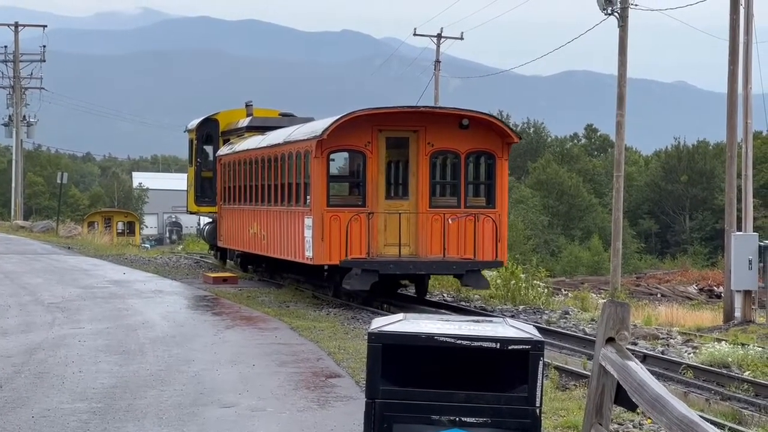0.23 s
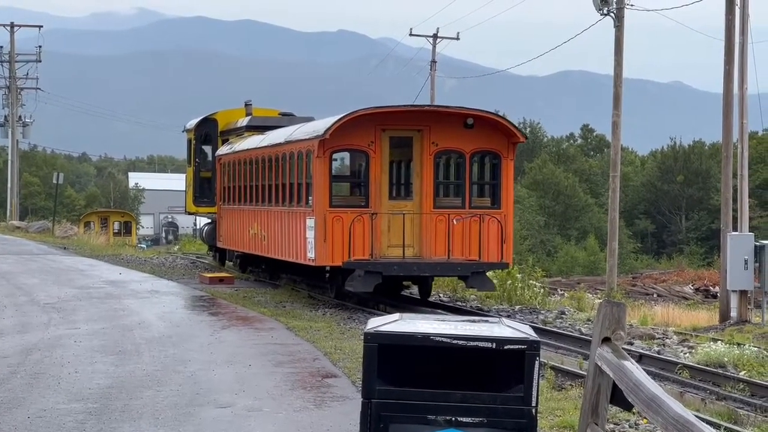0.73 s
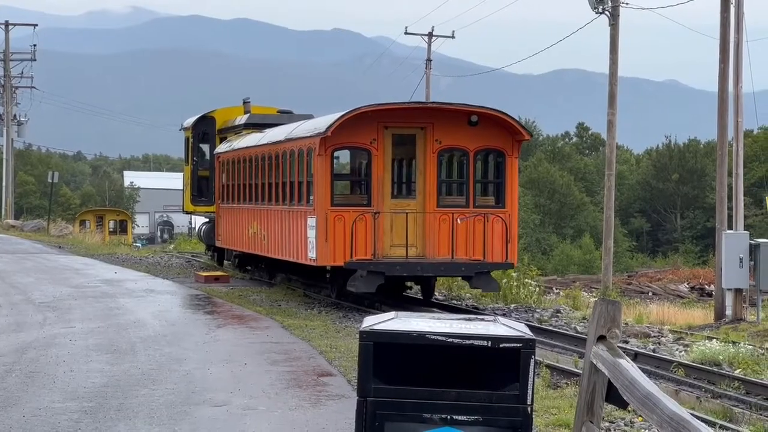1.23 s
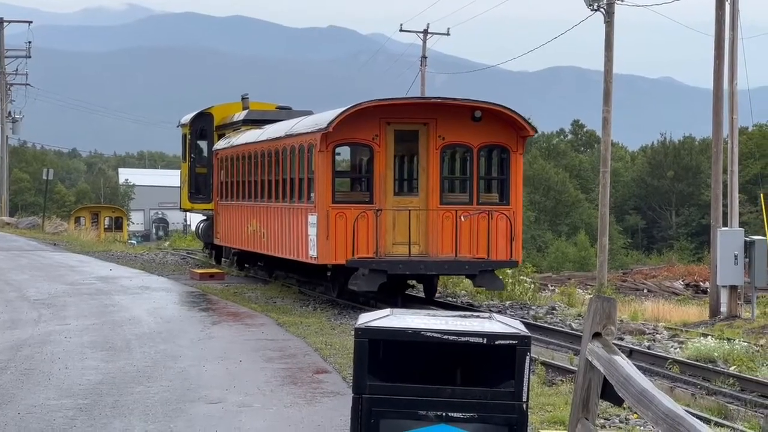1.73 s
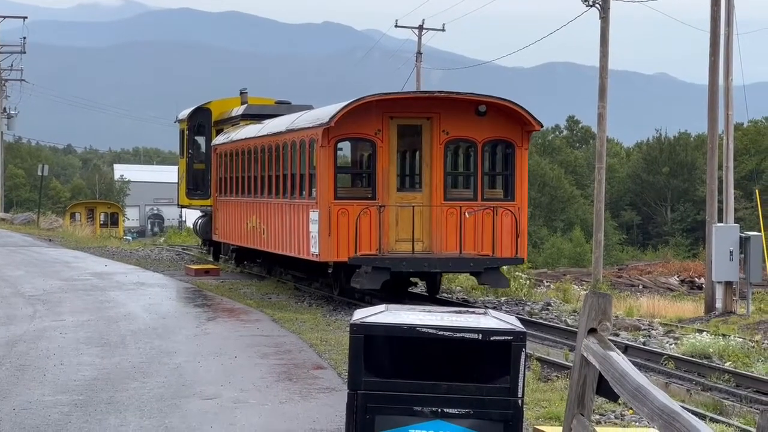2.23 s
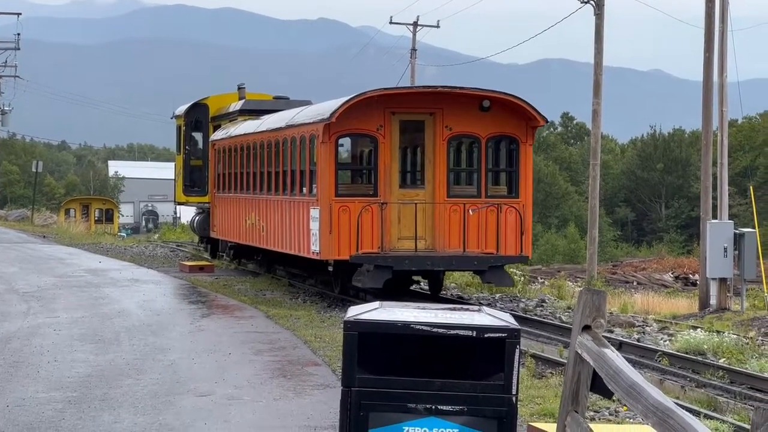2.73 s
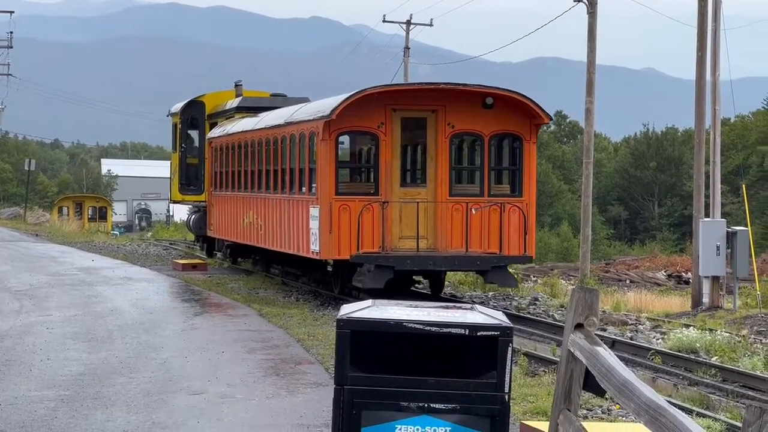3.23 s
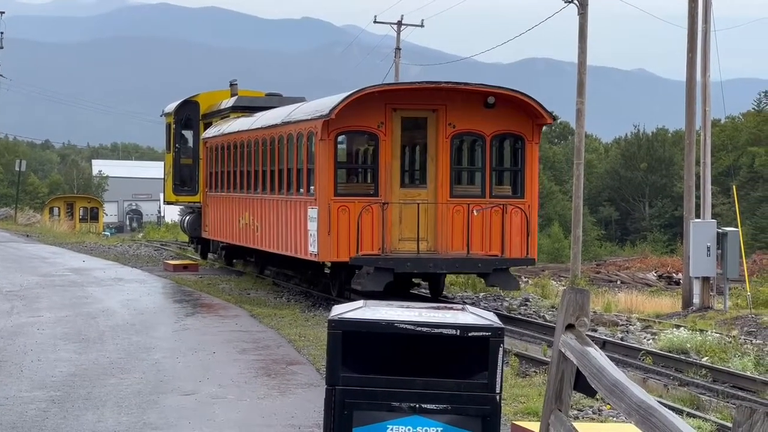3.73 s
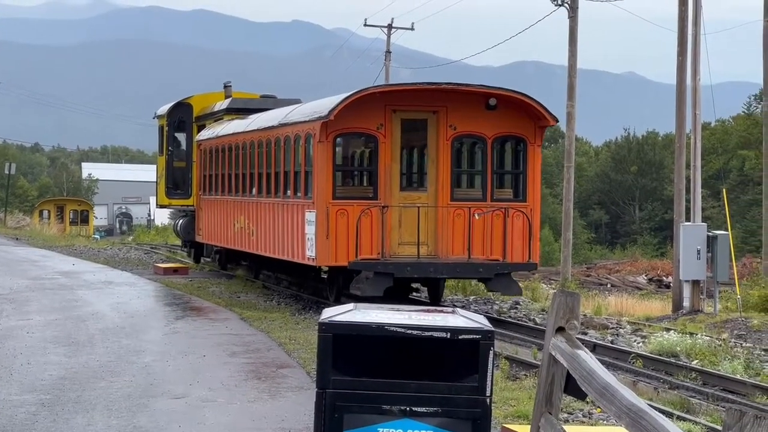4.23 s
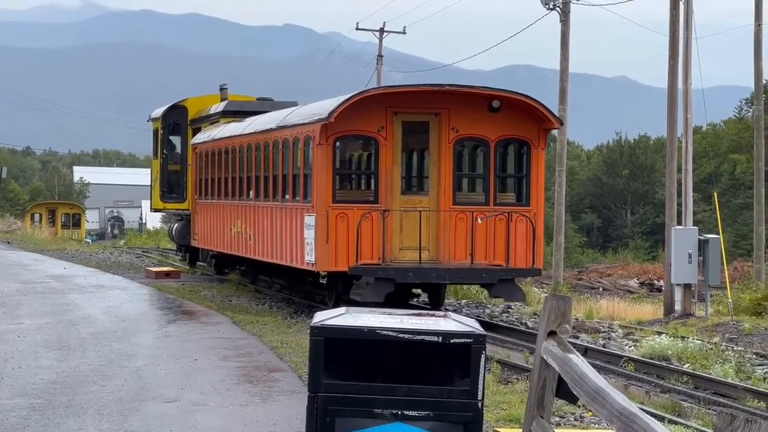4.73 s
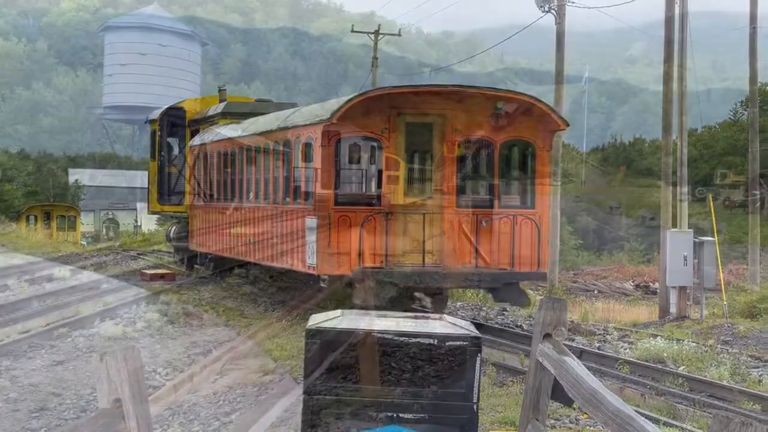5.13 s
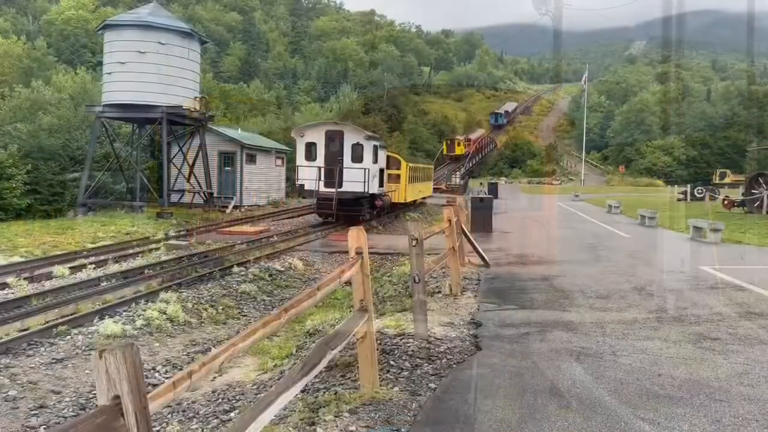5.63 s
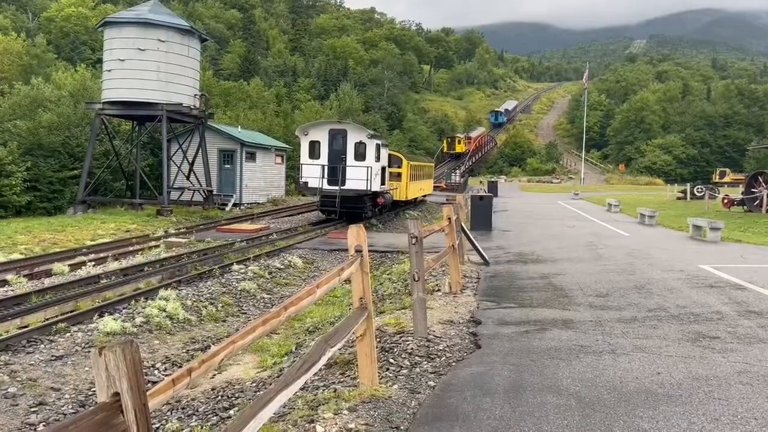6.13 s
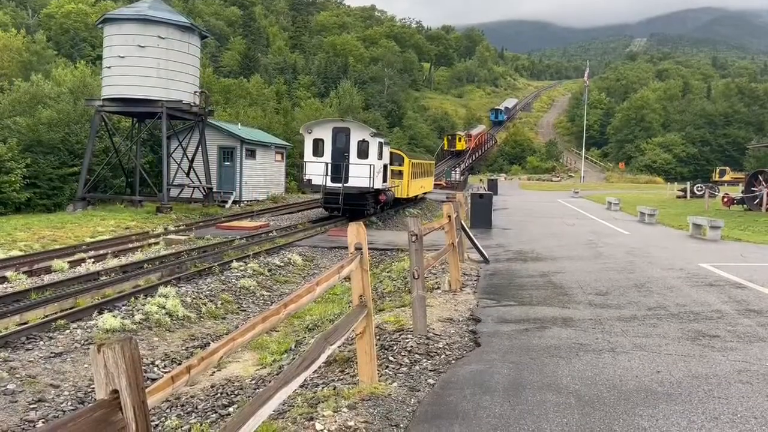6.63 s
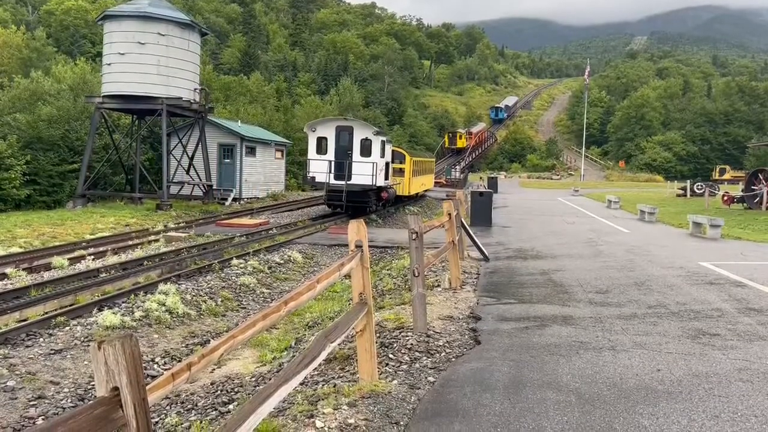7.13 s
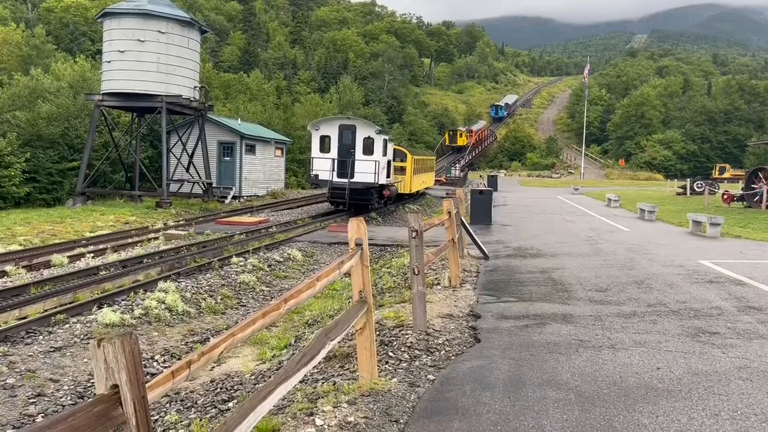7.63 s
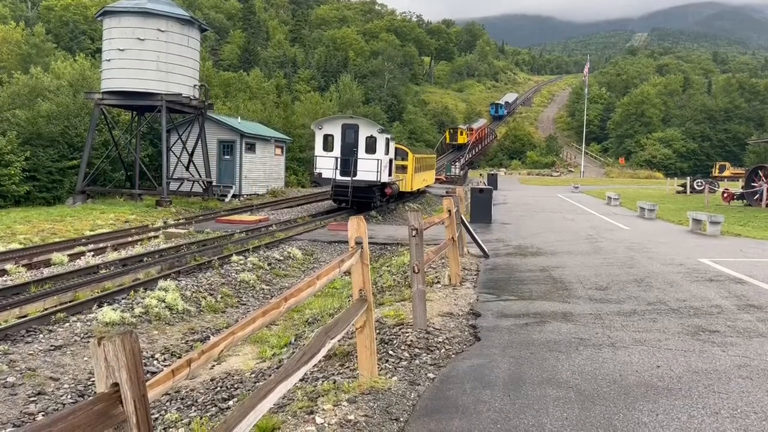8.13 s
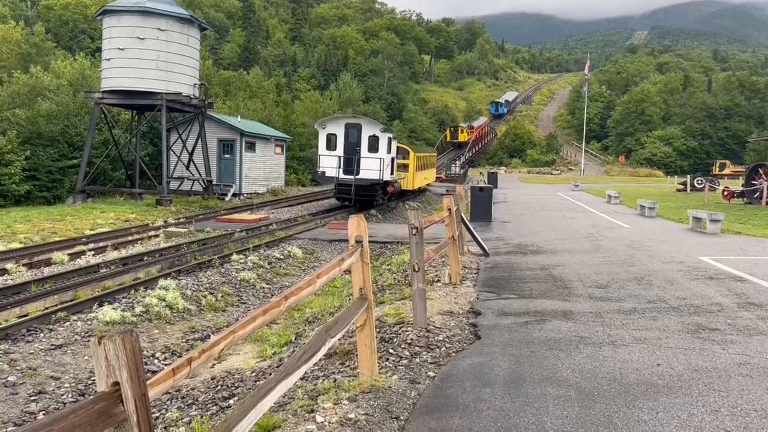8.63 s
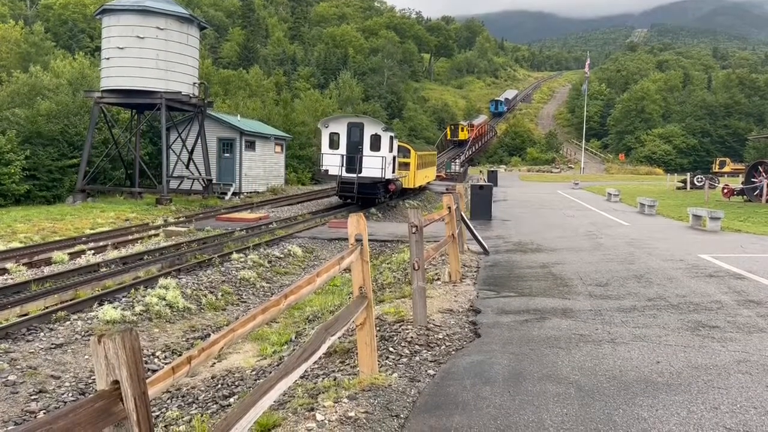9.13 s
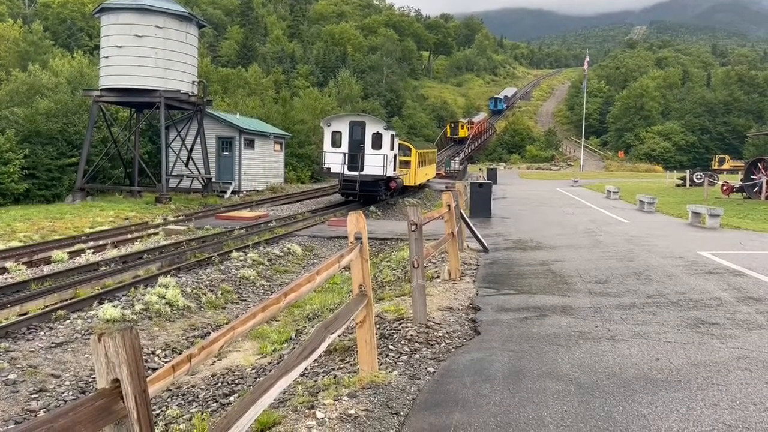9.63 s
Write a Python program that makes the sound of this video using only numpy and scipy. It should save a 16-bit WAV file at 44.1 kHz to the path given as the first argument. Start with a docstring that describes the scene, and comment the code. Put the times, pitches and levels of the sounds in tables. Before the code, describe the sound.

From the start, a diesel locomotive idles outdoors a little way off, with a deep, steady throb, a pulsing hum, rapid clatter and a thin hiss. Light gusts bump the microphone at the very start, near 1 second and around 3 seconds. Until about 5 seconds, a faint insect makes short, very high rasps. Between 5 and 6 seconds the sound blends smoothly into a louder, rougher engine in a rail yard, slightly to the left. Its exhaust rumbles, its block knocks and its gears give a narrow, unsteady whine. A low boom swells near 6 seconds and dies away before 8. Close by, soft gravel crunches and tiny ticks begin at about 5.3 seconds. From 8 seconds the crunches come more often and more clearly, with single stones clinking, while the engine keeps rumbling to the end, near 10 seconds.

```python
"""A steady diesel throb and clatter come from a rack-railway locomotive idling behind a coach.
High in the grass an insect scrapes its wing, and light gusts buffet the microphone.
From about five seconds a cross-fade leads to the yard and a louder, rougher engine: the exhaust
rumbles, the block knocks and the gears whine. Close by, gravel crunches and single stones clink."""
import sys
import numpy as np
from scipy import signal
from scipy.fft import rfft, irfft, next_fast_len
from scipy.io import wavfile

SR = 44100
rng = np.random.default_rng(int(sys.argv[2]) if len(sys.argv) > 2 else 0)


def log_audio(samples):
    """Write samples as a 16-bit WAV file to the path given in sys.argv[1]."""
    # one column per channel
    frames = np.atleast_2d(samples).T
    # limit to full scale, then quantise
    limited = np.clip(frames, -1, 1)
    pcm = np.round(limited * 32767).astype(np.int16)
    wavfile.write(sys.argv[1], SR, pcm)


N = 436149
TIME = np.arange(N) / SR
FFT_SIZE, PADDED_SIZE = next_fast_len(N), next_fast_len(N + 2048)
FADE_FROM_S, FADE_TO_S = 4.97, 6.08  # the place by the coach gives way to the yard
COACH_CYCLE_HZ, YARD_CYCLE_HZ = 9.084, 9.076  # one engine cycle is two crankshaft turns


def gain_of(db):
    """Decibels to amplitude."""
    return 10 ** (np.asarray(db) / 20)

def unit_rms(x):
    """Scales to rms 1."""
    return x / np.sqrt(np.mean(x ** 2) + 1e-20)

def over_time(points):
    """Joins rows of seconds and value into a curve over the whole scene."""
    return np.interp(TIME, *np.transpose(points))

def over_frequency(points, hz):
    """Reads a spectrum table on a log-frequency axis."""
    f, value = np.transpose(points)
    return np.interp(np.log(hz + 1), np.log(f + 1), value)

def add(mix, start_s, sound):
    """Mixes a stereo sound in at its start time."""
    part = mix[:, max(round(start_s * SR), 0):][:, :sound.shape[1]]
    part += sound[:, :part.shape[1]]

def noise(size=N):
    """Two unrelated channels of white noise."""
    return rng.standard_normal((2, size))

def drift(hz, step=1):
    """A random wander of rms 1, with up to hz swings a second, at every step-th sample."""
    t = np.linspace(0, N / SR, 4000)
    rates = hz * np.geomspace(1 / 8, 1, 24)[:, None]
    waves = np.sin(2 * np.pi * (rates * t + rng.random(rates.shape)))
    return np.interp(TIME[::step], t, unit_rms(waves.sum(0)))

def band(hz, width_octaves, size=FFT_SIZE):
    """A narrow band of stereo noise, rms 1."""
    octaves = np.log2((np.fft.rfftfreq(size, 1 / SR) + 1) / hz)
    shape = np.exp(-.5 * (octaves / width_octaves) ** 2)
    white = rng.standard_normal(size) + .5 * noise(size)
    return unit_rms(irfft(rfft(white) * shape, size))[:, :N]

# How alike the two microphones hear each place. Each row: frequency in Hz, coherence from 0 to 1.
COACH_COHERENCE = [(100, .98), (290, 0.92), (640, 0.65), (1400, 0.73), (2600, 1), (4400, 0.78), (8000, 1),
                   (15000, 1)]
YARD_COHERENCE = [(100, 0.97), (250, 1), (400, 0.69), (640, 0.58), (1400, 0.5), (3100, 0.57), (7000, 1),
                  (15000, 1)]
def colour(pair, spectrum, coherence):
    """Two unrelated signals become the middle and side of a stereo sound with this spectrum."""
    hz = np.fft.rfftfreq(FFT_SIZE, 1 / SR)
    mid, side = rfft(pair, FFT_SIZE) * gain_of(over_frequency(spectrum, hz))
    alike = np.clip(over_frequency(coherence, hz), 0, 1)
    width = np.sqrt((1 - alike) / (1 + alike))
    mid, side = irfft([mid, side * width], FFT_SIZE)[:, :N]
    return np.array([mid + side, mid - side]) / mid.std()


# The open air in both places. Each row: frequency in Hz, relative density in dB.
AIR_SPECTRUM = [(1000, -10), (5000, 0), (7500, 0), (8500, -3), (9500, -7), (12500, -7), (15000, -15)]
def air(level_db, coherence):
    """Leaves and distant hiss make a steady bed of high noise."""
    return gain_of(level_db) * colour(noise(), AIR_SPECTRUM, coherence)

# High swishes by the coach, thin whistles in the yard. Each row: start in seconds, level in dB.
COACH_SWISHES = [(.46, -67), (1.33, -62), (2.79, -57.5), (3.4, -64)]
YARD_WHISTLES = [(6.29, -58), (7.82, -60)]
def hiss_swells(swells, length_s, hz, width_octaves):
    """A narrow band of hiss comes and goes softly."""
    out, size = np.zeros((2, N)), int(length_s * SR)
    for start, db in swells:
        add(out, start, gain_of(db) * band(hz, width_octaves, size) * np.hanning(size))
    return out

# Light gusts right on the microphone. Each row: start in seconds, length in seconds, level in dB.
GUSTS = [(0, 0.13, -27), (0.93, 0.12, -30), (2.658, 0.11, -32), (2.829, 0.18, -33.5), (3.442, 0.13, -38)]
def gusts(hz=75, width_octaves=0.58):
    """Each gust is a short, low push of air."""
    out = np.zeros((2, N))
    for start, length, db in GUSTS:
        size = int(length * SR)
        push = unit_rms(band(hz, width_octaves, size)[:1])
        add(out, start, gain_of(db) * push * np.hanning(size))
    return out

# An insect in the grass by the coach.
# Each row: start in seconds, length in seconds, level in dB, dip in pitch in Hz.
INSECT_RASPS = [(0.182, 0.06, -61, 100), (0.252, 0.084, -58, 300), (0.441, .15, -60, 201),
                (0.744, 0.05, -54, 330), (0.89, 0.21, -60, 320), (1.044, .2, -58.5, 220),
                (1.847, .07, -58, 40), (2.05, .058, -56, 80), (2.17, .053, -56, 160),
                (2.33, .045, -54, 130), (2.427, .53, -58.5, 280), (3.035, 0.08, -58, 30),
                (4.136, .15, -59.5, 140), (4.27, 0.25, -66.5, 180), (4.524, 0.37, -60, 350),
                (4.89, .17, -63, 200)]
def insect(wing_hz=12920, sway_hz=30, ring_hz=135, flutter_db=3.0, echo_db=-14, echo_s=.05):
    """A file scrapes a tiny wing resonance; in each rasp the strokes flutter and the pitch dips."""
    effort, sag = np.zeros((2, 1, N))
    for start, length, db, dip_hz in INSECT_RASPS:
        progress = np.linspace(0, 1, int(length * SR))[None]
        envelope = signal.windows.tukey(progress.size, min(0.039 / length, 1))
        add(effort, start, gain_of(db) * envelope[None])
        add(sag, start, dip_hz * np.sqrt(4 * progress * (1 - progress)))
    pitch_hz = wing_hz - sag[0] + sway_hz * drift(30)
    scrape = rng.standard_normal(N) + 1j * rng.standard_normal(N)
    ring = signal.sosfilt(signal.butter(3, ring_hz, fs=SR, output="sos"), scrape)
    wing = (ring * np.exp(2j * np.pi * np.cumsum(pitch_hz) / SR)).real
    rasp = effort * unit_rms(wing * gain_of(flutter_db * drift(50)))
    t = np.arange(SR // 4) / SR
    scatter = noise(len(t)) * np.exp(-t / echo_s)  # thrown back by the grass and trees
    echo = signal.oaconvolve(rasp, scatter / np.linalg.norm(scatter[0]))[:, :N]
    return rasp + gain_of(echo_db) * echo

# Sharp ticks in the yard. Each row: start in seconds, level in dB.
YARD_TICKS = [(5.1981, -50), (5.3063, -47), (5.531, -48.5), (5.64, -49), (6.0881, -47), (6.2044, -51),
              (6.427, -50), (6.5415, -49), (6.8648, -41), (7.3292, -45)]
def ticks(hz=8000, width_octaves=0.1, attack_s=.0003, decay_s=0.003):
    """Tiny bright ticks, each gone in a few milliseconds."""
    out, t = np.zeros((2, N)), np.arange(1024) / SR
    envelope = (1 - np.exp(-t / attack_s)) * np.exp(-t / decay_s)
    for start, db in YARD_TICKS:
        add(out, start, gain_of(db) * band(hz, width_octaves, len(t)) * envelope)
    return out

# Stones knocking near the microphone.
# Each row: start in seconds, level in dB, pitch as a multiple of the modes, chatter time in seconds.
STONE_CLINKS = [(5.372, -48, 1.0, 0.013), (8.045, -47.5, 1.0, .01), (8.275, -48, .99, .014),
                (8.585, -47, .99, .025), (8.84, -44.5, 1.0, .018), (9.244, -48, 1.2, .008),
                (9.785, -53, 1.22, .009)]
# The ring of one stone. Each row: frequency in Hz, relative level in dB, seconds to fall by 60 dB.
STONE_MODES = [(3650, 7, 0.028), (3710, 11, 0.064), (4048, -1, .03), (4600, 6, .045), (6078, -6, .04),
               (6799, -1, .04)]
def clinks():
    """A stone chatters against its neighbours for a moment and rings in a few short modes."""
    out, t = np.zeros((2, N)), np.arange(SR // 4) / SR
    for start, level_db, pitch, chatter in STONE_CLINKS:
        contacts = noise(len(t)) * t * np.exp(-t / chatter)
        ring = sum(gain_of(db - 60 * t / t60) * np.sin(2 * np.pi * hz * pitch * t)
                   for hz, db, t60 in STONE_MODES)
        clink = signal.fftconvolve(contacts, ring[None], axes=1)
        add(out, start, gain_of(level_db) * clink / clink[:, :SR // 20].std())
    return out

# Stones grinding together close by. Each row: frequency in Hz, relative density in dB.
GRAVEL_SPECTRUM = [(2000, -30), (3300, -13), (3700, 1), (4050, -2), (4350, -1), (4600, 4), (4830, -3),
                   (5150, 1.5), (5450, -11), (5720, -11), (5876, 0), (6000, -4), (6130, -1), (6260, -8),
                   (6390, -2), (6500, -8), (6622, -1), (6710, -11), (6804, -1), (6890, -5), (6983, 3),
                   (7250, -5), (7650, 0), (7850, -9), (8400, -9), (9500, -18), (12300, -14), (13500, -19),
                   (15000, -24)]
# Loose gravel stirring between crunches. Each row: time in seconds, level in dB.
GRAVEL_STIR = [(5.1, -66), (5.8, -53.5), (6.4, -60), (7.7, -61.5), (8.45, -53.5), (9.0, -58), (9.85, -56.5)]
# The loudest crunches. Each row: start in seconds, level in dB, rise and decay times in seconds,
# brightness in dB per octave.
GRAVEL_CRUNCHES = [(5.40, -51, .008, 0.046, 0), (5.53, -49, .005, 0.069, 5),
                   (5.61, -50.5, .004, 0.036, 0.5), (5.715, -50, .004, .05, 0), (5.86, -49, .008, .13, 1),
                   (7.21, -47, .003, .04, 1), (7.925, -49, .01, .04, 4), (8.165, -49, .005, 0.026, 5),
                   (8.275, -45, .007, 0.04, 1), (8.455, -43, .007, 0.078, -4), (8.58, -40.5, .025, .08, -6),
                   (8.69, -43, .003, .025, -4), (8.838, -41, .009, .05, -3), (9.06, -45, .008, .03, 6),
                   (9.17, -47, .008, .03, 3), (9.244, -39, .002, .022, 0), (9.27, -41, 0.011, .052, -5),
                   (9.525, -43, .007, 0.027, 1), (9.669, -44, .006, 0.066, 1),
                   (9.783, -39.5, 0.0037, 0.033, -2), (9.835, -45, .01, .1, -1)]
def gravel(grains_per_s=2200, spread_db=1.5, clump_db=1.5, scuffs_per_s=4.7, scuff_db=6):
    """Each crunch is a dying burst of tiny stone clicks; loose stones stir and scuff in between."""
    clicks = noise() * (rng.random(N) < grains_per_s / SR)
    clicks *= gain_of(spread_db * np.minimum(rng.exponential(1, N), 4))
    clumps = (unit_rms(clicks) + 0.45 * noise()) * gain_of(clump_db * drift(110))
    grit = colour(clumps, GRAVEL_SPECTRUM, YARD_COHERENCE)
    t = np.arange(SR // 2) / SR
    scuff_starts = 1.0 * (rng.random(N) < scuffs_per_s / SR)
    scuff_envelope = (1 - np.exp(-t / 0.0013)) * np.exp(-t / 0.033)
    scuffs = gain_of(scuff_db) * signal.oaconvolve(scuff_starts, scuff_envelope)[:N]
    stir = gain_of(over_time(GRAVEL_STIR)) * np.hypot(gain_of(1.1 * drift(9.8)), scuffs)
    out = stir * grit * (TIME > FADE_FROM_S)
    octaves = np.log2(np.clip(np.fft.rfftfreq(len(t), 1 / SR), 3000, 9000) / 5000)
    for start, db, rise, decay, tilt_db in GRAVEL_CRUNCHES:
        burst = grit[:, rng.integers(N - len(t)):][:, :len(t)]
        burst = unit_rms(irfft(rfft(burst) * gain_of(tilt_db * octaves), len(t)))
        envelope = (1 - np.exp(-t / rise)) * np.exp(-t / decay)
        add(out, start, gain_of(db) * burst * envelope)
    return out


def engine_tones(partials, lag_s, waver, smear, step=8):
    """Tones follow the engine's speed; moving air shakes the level and pitch of the higher ones most."""
    t, out = (TIME + lag_s)[::step], 0
    for hz, db in partials:
        depth = waver * np.sqrt(hz / (hz + 300))
        blur = smear * hz / (hz + 900) * drift(12, step)
        level = gain_of(db) * (1 + depth * drift(5, step)) / np.sqrt(1 + depth ** 2)
        out = out + level * np.sin(2 * np.pi * (hz * t + rng.random()) + blur)
    return np.sqrt(2) * signal.resample_poly(out, step, 1, window=("kaiser", 9))[:N]

def clatter(cycles, repeat, knock_db=2.0, gallop_db=0.0, per_turn=0.38):
    """Twelve unequal knocks a cycle; part of the rattle recurs in every cycle or crankshaft turn."""
    phase, size = cycles % 1, SR // 9
    place = (phase * size).astype(int) % size
    each_cycle = noise(size)[:, place]
    each_turn = noise(size)[:, place % (size // 2)]
    recurring = np.sqrt(1 - per_turn) * each_cycle + np.sqrt(per_turn) * each_turn
    rattle = np.sqrt(repeat) * recurring + np.sqrt(1 - repeat) * noise()
    firing = phase * 12
    strength = rng.permutation(np.linspace(0, 2, 12))[firing.astype(int)]
    knocks = strength * np.exp(-(firing % 1) / 0.27)
    gallop = np.cos(4 * np.pi * cycles)  # once a turn of the crankshaft
    return rattle * gain_of(knock_db * knocks + gallop_db * gallop)

# Exhaust rumble, and clatter from the block and its covers, heard from beyond the coach.
# Each row: frequency in Hz, relative density in dB.
COACH_RUMBLE = [(15, -50), (26, -41), (36, -7), (50, -1.5), (92, 0), (135, -10), (200, -8.5), (270, -13),
                (400, -18.5), (600, -25), (1500, -132)]
COACH_CLATTER = [(200, -21), (420, -6.5), (680, 0), (860, -2), (930, -6.5), (1300, -6.5), (1650, -10),
                 (2020, -8), (2350, -14), (3050, -16.5), (3800, -21.5), (4900, -29.5), (8000, -39.5),
                 (10000, -58)]
# The higher exhaust and fan tones. Each row: frequency in Hz, level in dB.
COACH_TONES = [(104.6, -53.5), (109.5, -42), (119.1, -44.5), (127.8, -51), (164.2, -52.5), (195.1, -54.5),
               (238.2, -63), (290.2, -50), (296.2, -54.5), (357.2, -59.5), (511.1, -71), (580, -59.5),
               (602.4, -56), (657.1, -58.5), (766.6, -60), (1241.4, -57.5)]
# As the train creeps nearer, block and intake carry better and one fan tone dies down.
# Each row: time in seconds, level in dB.
COACH_CARRY = [(0, -42.5), (2.3, -41.5), (3.4, -40.5)]
FAN_LEVEL = [(0, -55), (1.8, -52), (2.6, -55), (5, -60)]
def coach_engine(fan_hz=437.6, intake_hz=4216):
    """The locomotive idles in the open air behind the coach, with a thin hiss from its intake."""
    carry = gain_of(over_time(COACH_CARRY))
    lag_s = .0005 * drift(1.2) + .00006 * drift(14)  # the governor hunts a little
    rumble = gain_of(-35.5 + 0.29 * drift(4)) * colour(noise(), COACH_RUMBLE, COACH_COHERENCE)
    rattle = clatter(COACH_CYCLE_HZ * (TIME + lag_s), repeat=0.43)
    block = carry * colour(rattle, COACH_CLATTER, COACH_COHERENCE)
    intake = carry * gain_of(-18.0) * band(intake_hz, width_octaves=0.066)
    outdoors = air(-62.0, COACH_COHERENCE)
    fan = gain_of(over_time(FAN_LEVEL)) * engine_tones([(fan_hz, 0)], lag_s, waver=0.89, smear=1.5)
    hum = engine_tones(COACH_TONES, lag_s, waver=0.55, smear=0.63)
    return (rumble + block + intake + outdoors + fan + hum) * gain_of([[.3], [-.3]])

# Hiss from the engine in the yard. Each row: centre in Hz, width in octaves, level in dB.
HISS_BANDS = [(4160, 0.076, -53.5), (5060, 0.047, -65), (6160, 0.023, -70)]
# Its slow swell. Each row: time in seconds, gain in dB.
HISS_SWELL = [(5.3, 2.5), (6.1, -2), (6.38, 1), (6.7, -0.5), (7.15, .5), (7.6, -2.5), (8.3, -1), (9.8, -1)]
def engine_hiss():
    """Three narrow bands of hiss swell and sink together."""
    hiss = sum(gain_of(db) * band(hz, width) for hz, width, db in HISS_BANDS)
    return hiss * gain_of(over_time(HISS_SWELL) + drift(10))

# Strain on the gears in the yard, heard as whine. Each row: time in seconds, level in dB.
WHINE_LEVEL = [(5.2, -38), (5.7, -46.5), (6.2, -45.5), (7.3, -43.5), (7.9, -47.5)]
def gear_whine(teeth_per_cycle=136):
    """Meshing teeth sing one narrow, unsteady note."""
    mesh = np.exp(2j * np.pi * teeth_per_cycle * YARD_CYCLE_HZ * TIME)
    waver = 2.0 + drift(18) + 1j * drift(18)
    return gain_of(over_time(WHINE_LEVEL)) * unit_rms((waver * mesh).real)

# A low boom in the yard. Each row: time in seconds, level in dB.
BOOM_LEVEL = [(5.3, -40), (5.8, -30.5), (6.3, -34), (7.2, -36), (7.8, -50), (9.85, -60)]
def yard_boom(hz=98, width_octaves=0.37):
    """A band of deep noise swells and dies away."""
    return gain_of(over_time(BOOM_LEVEL)) * unit_rms(band(hz, width_octaves)[:1])

# Exhaust rumble and block clatter in the yard. Each row: frequency in Hz, relative density in dB.
YARD_RUMBLE = [(15, -40), (27, -27), (37, -20), (62, -3.5), (115, 0), (160, -3), (230, -6), (300, -12.5),
               (380, -12.5), (450, -29.5), (1500, -123)]
YARD_CLATTER = [(250, -16.5), (450, -8.5), (600, -1.5), (750, -0.5), (950, -3.5), (1270, -2.5),
                (1600, -7.5), (1950, -5.5), (2450, -12), (2800, -18.5), (3300, -19.5), (5600, -26.5),
                (8000, -75), (10000, -84)]
# The higher exhaust and fan tones. Each row: frequency in Hz, relative level in dB.
YARD_TONES = [(44.4, -43.5), (109.0, -36.5), (118.6, -40.5), (154.2, -44), (222, -47.5), (265, -47.5),
              (288.4, -48.5), (544.6, -50.5), (617.2, -49.5), (653.5, -54), (662.5, -53.5), (735.2, -48.5),
              (1007.4, -55), (1071, -57), (1325.1, -55), (1361.4, -53)]
# The engine draws slowly away. Each row: time in seconds, rumble level in dB, clatter level in dB.
YARD_LEVELS = [(5.8, -29, -32.5), (6.7, -30.5, -34.5), (7.7, -31, -34.5), (8.5, -31.5, -33.5),
               (9.85, -29.5, -35)]
def yard_engine(right_delay_samples=2):
    """The louder, rougher engine rumbles and knocks in the open air, a little to the left."""
    times, rumble_db, clatter_db = np.transpose(YARD_LEVELS)
    lag_s = .0003 * drift(1.2) + .00003 * drift(14)
    boom = yard_boom()
    rumble = colour(noise(), YARD_RUMBLE, YARD_COHERENCE)
    rumble *= gain_of(np.interp(TIME, times, rumble_db) + 0.23 * drift(3))
    rattle = clatter(YARD_CYCLE_HZ * (TIME + lag_s), repeat=0.34, gallop_db=0.3)
    block = colour(rattle, YARD_CLATTER, YARD_COHERENCE)
    block *= gain_of(np.interp(TIME, times, clatter_db) + 0.15 * drift(3.9))
    hiss = engine_hiss()
    outdoors = air(-57.0, YARD_COHERENCE)
    whine = gear_whine()
    load_db = 0.42 * (over_time(THROB_LEVEL) + 26.4)  # the hum eases off with the throb
    hum = gain_of(load_db) * engine_tones(YARD_TONES, lag_s, waver=0.45, smear=1.0)
    left, right = rumble + boom + block + whine + hum
    return np.array([left, np.roll(right, right_delay_samples)]) + hiss + outdoors

def engine_note(hz, level_db):
    """A pure tone of moving pitch and level, 1 dB stronger at the left microphone."""
    turns = np.cumsum(hz) / SR
    return gain_of(level_db) * np.sqrt(2) * np.sin(2 * np.pi * turns) * gain_of([[.5], [-.5]])

# The firm higher note of the engines in both places. Each row: time in seconds, level in dB.
DRONE_LEVEL = [(0, -40), (1, -41), (1.4, -53), (1.9, -44), (2.65, -39.5), (3.05, -51), (3.6, -43),
               (4.8, -44.5), (5.3, -35.5), (6.2, -38.5), (6.9, -35.5), (8.4, -34.5), (8.7, -37.5),
               (9.8, -35)]
def drone(fade, coach_hz=145.3, yard_hz=144.5):
    """An engine note at sixteen beats a cycle pulses gently and runs on through the change of place."""
    hz = coach_hz + (yard_hz - coach_hz) * fade + 0.28 * drift(2)
    return engine_note(hz, over_time(DRONE_LEVEL) + 2.0 * drift(6))

# The deep exhaust throb in both places. Each row: time in seconds, level in dB.
THROB_LEVEL = [(0, -32.5), (.95, -35.5), (1.3, -35), (1.4, -43), (1.55, -34.5), (1.9, -39), (3.2, -34),
               (4.9, -33.5), (5.8, -28.5), (6.8, -29), (7.6, -31), (9.85, -34.5)]
# How unevenly it surges behind the coach. Each row: time in seconds, swing in dB.
THROB_SURGE = [(0, 1.5), (1.9, 2), (2.6, 0), (5.5, 0)]
def throb(fade, coach_hz=54.95, yard_hz=54.55):
    """The exhaust's firing note, six beats a cycle, surges at first and runs on into the yard."""
    hz = coach_hz + (yard_hz - coach_hz) * fade + 0.13 * drift(2.07)
    return engine_note(hz, over_time(THROB_LEVEL) + over_time(THROB_SURGE) * drift(9))


# How the yard leans across the microphones. Each row: frequency in Hz, left minus right in dB.
YARD_BALANCE = [(1300, 1), (2200, -1.3), (2700, .3), (3500, 1.8), (5700, 2), (6100, 5.5), (7000, 4),
                (7500, 0)]
def in_yard(sound, bounce_s=.0019, bounce_db=-21.5):
    """Some bands lean to one side; the right microphone also hears a bounce off something close by."""
    hz = np.fft.rfftfreq(PADDED_SIZE, 1 / SR)
    lean = gain_of(over_frequency(YARD_BALANCE, hz) * [[.5], [-.5]])
    left, right = rfft(sound, PADDED_SIZE) * lean
    bounce = gain_of(bounce_db) * np.exp(-2j * np.pi * hz * bounce_s)
    return irfft([left, right * (1 + bounce)], PADDED_SIZE)[:, :N]

def scene():
    """The place by the coach, then the yard, joined by an equal-power cross-fade."""
    fade = np.clip((TIME - FADE_FROM_S) / (FADE_TO_S - FADE_FROM_S), 0, 1)
    coach = np.cos(fade * np.pi / 2) * (coach_engine() + insect() + gusts())
    coach += hiss_swells(COACH_SWISHES, length_s=.18, hz=7100, width_octaves=0.22)
    yard = np.sin(fade * np.pi / 2) * yard_engine() + gravel() + clinks() + ticks()
    yard += hiss_swells(YARD_WHISTLES, length_s=.54, hz=6100, width_octaves=0.058)
    return throb(fade) + drone(fade) + coach + in_yard(yard)

# How far the left microphone port leads the right. Each row: frequency in Hz, phase in radians.
PORT_LEAD = [(2500, 0), (3500, .6), (4800, .5), (5800, 0), (7300, 0), (8000, -.7), (8700, -1.5),
             (9400, -2.8), (10700, -3.5), (11600, -4.7), (12300, -5.5), (13000, -6.28)]
def record(dry, edge_hz=15250):
    """The two microphone ports fall out of step in the treble; the recorder cuts off the very top."""
    lead = over_frequency(PORT_LEAD, np.fft.rfftfreq(PADDED_SIZE, 1 / SR))
    spectrum = rfft(dry, PADDED_SIZE) * np.exp(1j * lead * [[.5], [-.5]])
    at_ports = irfft(spectrum, PADDED_SIZE)[:, :N]
    lowpass = signal.firwin(511, edge_hz, window=("kaiser", 9), fs=SR)
    return signal.oaconvolve(at_ports, lowpass[None], "same")


dry = scene()
out = record(dry)
log_audio(out)
```